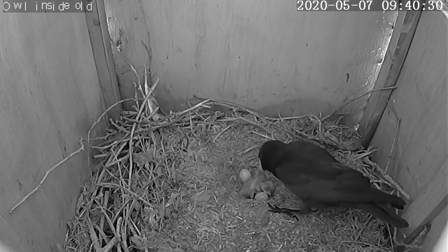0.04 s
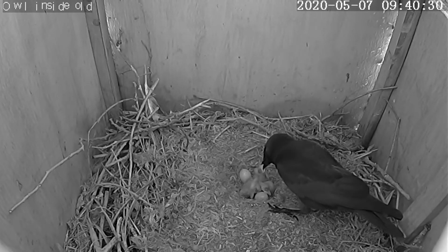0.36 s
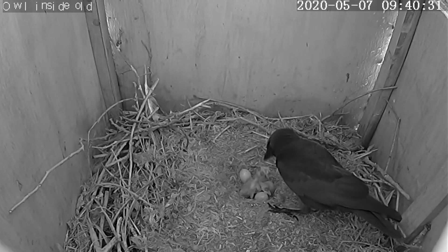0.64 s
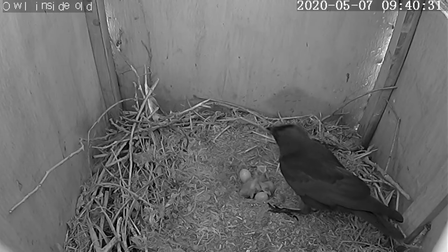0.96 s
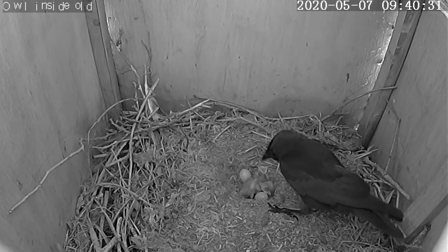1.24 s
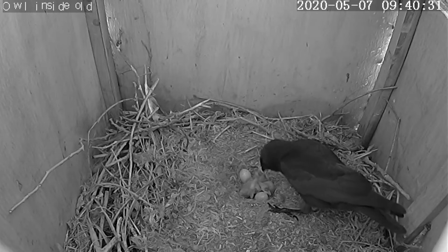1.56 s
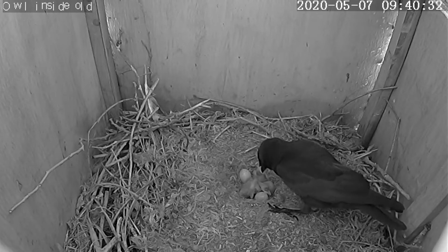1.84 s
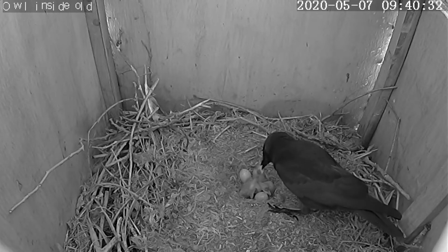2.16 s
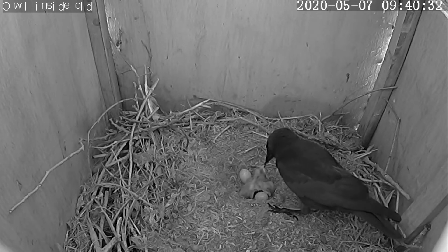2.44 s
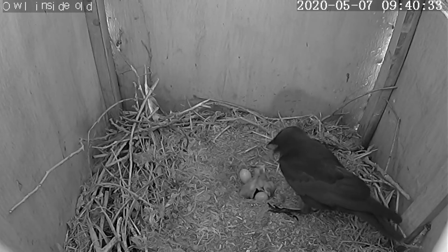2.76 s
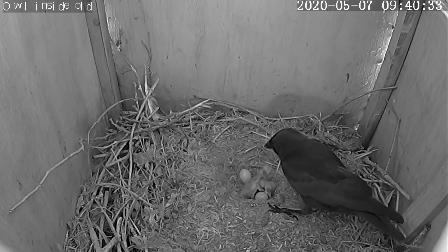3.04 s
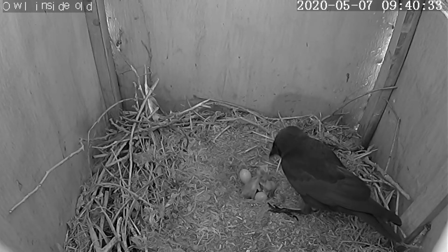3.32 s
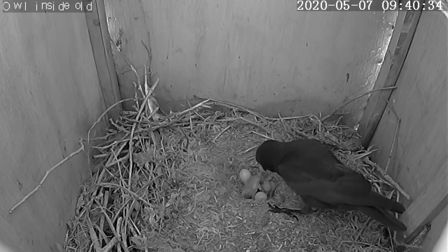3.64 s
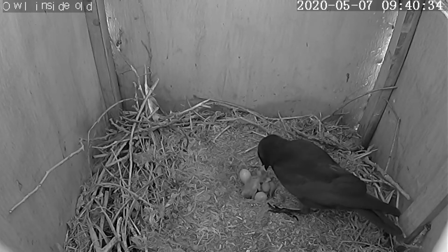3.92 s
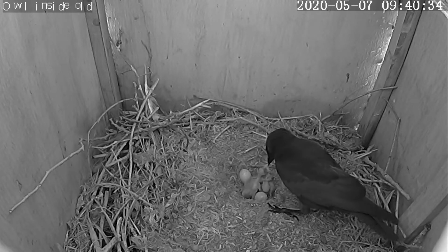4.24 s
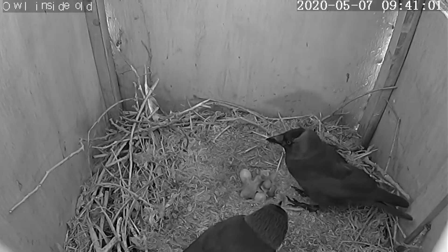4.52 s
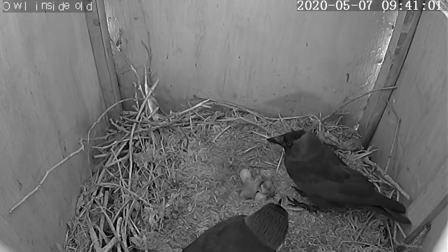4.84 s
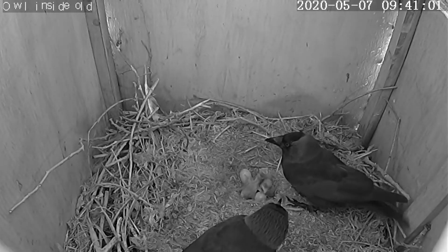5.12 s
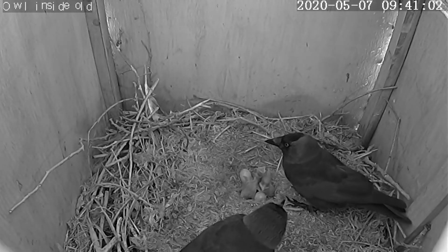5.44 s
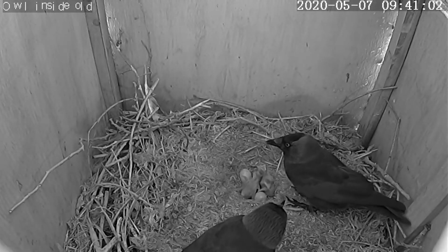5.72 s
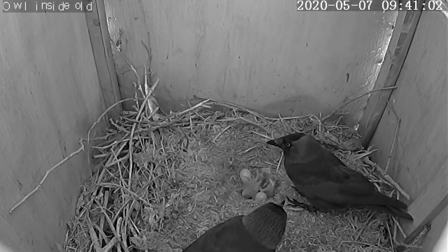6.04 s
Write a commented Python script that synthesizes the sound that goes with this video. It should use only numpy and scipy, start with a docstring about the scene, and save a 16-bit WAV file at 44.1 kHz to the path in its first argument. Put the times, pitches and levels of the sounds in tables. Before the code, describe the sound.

Newly hatched jackdaws beg with thin, arching whistles, some of them hoarse, over a faint hum. Midway a parent thumps and shuffles on the wooden boards. After a brief dropout the hum is gone, and an adult gives two loud, harsh calls with scratching and a quick wing flutter between them. A small microphone inside the nest box overloads slightly on the calls.

```python
"""Inside a wooden nest box, newly hatched jackdaws beg throughout with arched, partly hoarse whistles.
Near 3 s a parent thumps and shuffles: impacts ring the boards and friction makes noise. The humming nest
camera ticks once. Near 4.5 s a cut leaves a short silence, then softer noise without hum. From 5 s the
parent gives two harsh 'tchak' calls that overload the camera, with scratching and a wing flurry between.
All along, the camera's slow converter mirrors the sound into the treble."""
import sys
import numpy as np
from scipy import signal
from scipy.fft import rfft, irfft
from scipy.io import wavfile
from scipy.ndimage import uniform_filter1d

SR = 44100
rng = np.random.default_rng(int(sys.argv[2]) if len(sys.argv) > 2 else 0)


def master_out(mix):
    """Clip the mix to full scale and print it as 16-bit PCM to the path in sys.argv[1]."""
    frames = np.transpose(np.atleast_2d(mix))
    ceiling = np.clip(frames, -1, 1)
    pcm = np.round(ceiling * 32767).astype(np.int16)
    wavfile.write(sys.argv[1], SR, pcm)


N = 268128
T = np.arange(N) / SR
HZ = np.fft.rfftfreq(N, 1 / SR)
CUT_START_S, CUT_END_S = 4.455, 4.651

# spectrum of claws on wood and twigs: (frequency [Hz], level [dB])
CLAW_SPECTRUM = [(500, -16.5), (950, -9.5), (1200, 3.5), (1480, -14.5), (1700, 0), (1900, -14), (2100, 0),
                 (2350, 5), (2850, -1), (3400, -3.5), (4000, -17.5)]


def amp(db):
    """Amplitude ratio of a level in decibels."""
    return 10 ** (np.asarray(db) / 20)


def unit(x):
    """Normalisation to rms 1."""
    return x / np.sqrt(np.mean(x ** 2) + 1e-20)


def ramp(t, length):
    """Linear rise from 0 at t = 0 to 1 at t = length, then constant."""
    return np.clip(t / length, 0, 1)


def add(mix, start, sound):
    """Superposition of a sound on the mix from a start time in seconds."""
    part = mix[max(0, round(start * SR)):][:len(sound)]
    part += sound[:len(part)]


def colour(x, spectrum):
    """Spectral shaping by a curve of (frequency [Hz], gain [dB]) points."""
    hz, db = np.transpose(spectrum)
    return irfft(rfft(x) * amp(np.interp(np.log(HZ + 1), np.log(hz + 1), db)), N)


def noise(spectrum):
    """Filtered white noise of rms 1."""
    return unit(colour(rng.standard_normal(N), spectrum))


def wander(rate_hz):
    """Random modulation: low-passed noise of rms 1."""
    return unit(irfft(rfft(rng.standard_normal(N)) * np.exp(-(HZ / rate_hz) ** 2), N))


def resonate(x, hz, width_hz):
    """Double-pole resonance of gain 1 whose centre frequency may glide."""
    carrier = np.exp(2j * np.pi * np.cumsum(hz * np.ones(len(x))) / SR)
    pole = np.exp(-np.pi * width_hz / SR)
    baseband = signal.lfilter([(1 - pole) ** 2], [1, -2 * pole, pole * pole], x / carrier + 1e-18)
    return 2 * (carrier * baseband).real


def ring(modes, t, detune):
    """Free decay of damped modes, struck at a different spot each time; peak 1."""
    draws = rng.standard_normal((len(modes), 3))
    x = sum(amp(db + 2 * lift - 60 * t / t60) * np.sin(2 * np.pi * (hz * (1 + detune * shift) * t + phase))
            for (hz, db, t60), (lift, shift, phase) in zip(modes, draws))
    x = x * (1 - np.exp(-t / 0.002))
    return x / abs(x).max()


def nestlings(start_share=0.62, attack_s=0.0082, release_s=0.013, release_db=-21):
    """Frequency modulation: a thin whistle arches up, holds and falls; near the top it may rasp."""
    # (time [s], rise [s], hold [s], fall [s], top pitch [Hz], end pitch [Hz],
    #  level [dB], tail level [dB], hoarseness [0-1])
    squeaks = [ (-.06, 0.024, 0.013, 0.067, 3455, 3112, -19, -25, 0),
               (.125, 0.096, 0.012, 0.014, 3750, 3750, -70.5, -72, 0.2),
               (1.529, 0.029, 0.023, 0.049, 3024, 2550, -37, -36.5, 0.01),
               (1.637, 0.045, 0.014, 0.049, 3493, 3090, -31.5, -37.5, 0.22),
               (1.795, 0.029, 0.051, 0.11, 3430, 2637, -24.5, -26, 0.65),
               (2.205, .02, .11, 0.08, 3876, 3750, -39, -46, 0.12),
               (2.412, 0.038, 0.0097, 0.029, 2873, 2680, -40.5, -44.5, 0),
               (2.577, 0.03, .068, 0.085, 3461, 2494, -28, -22, 0.85),
               (2.63, 0.016, 0.029, 0.026, 832, 820, -38.5, -40, 0.13),
               (3.026, 0.055, 0.013, 0.053, 3885, 3250, -32.5, -38, 0.21),
               (3.279, 0.032, 0.062, 0.091, 3432, 2335, -25.5, -21, 0.7),
               (3.751, 0.0086, 0.025, 0.057, 3850, 3820, -56.5, -62, 0),
               (4.027, 0.03, 0.066, 0.083, 3426, 2425, -27.5, -21.5, 0.8),
               (4.08, 0.011, 0.025, 0.01, 817, 836, -41.5, -48, 0),
               (4.152, 0.036, 0.012, 0.027, 3232, 3020, -30.5, -38, 0.1),
               (4.407, 0.01, 0.023, 0.018, 1876, 1840, -54, -55, 0.07),
               (4.601, 0.028, 0.015, .066, 3448, 3033, -33, -37, .05),
               (4.635, 0.01345, 0.013, 0.015, 2020, 1940, -45, -52, 0.1),
               (4.786, .015, .01, .03, 2450, 2370, -64, -62, 0.17),
               (4.914, 0.033, .125, 0.12, 3810, 2330, -34.5, -38, 0.78),
               (5.212, .054, 0.014, 0.096, 3854, 3245, -33.5, -33, 0.36),
               (5.6, 0.023, 0.11, 0.04, 2840, 1910, -31.5, -30.5, 0.48),
               (5.743, .018, 0.13, 0.089, 3766, 2980, -30.5, -29.5, 0.42),
               (6.043, 0.033, .06, 0.17, 3860, 2500, -38.5, -39.5, 0.77), ]
    # one squeal that swells, cracks and drops to a clear note:
    # (time [s], pitch [Hz], level [dB], hoarseness [0-1])
    squeal = [(.336, 2785, -51, 0.42), (.35, 3487, -31.5, .4), (.365, 3900, -32, .15),
              (.4, 3870, -28.5, 0.49), (0.416, 3970, -15.5, 0.24), (.433, 3150, -20.5, 0.24),
              (.448, 3186, -15, 0.06), (0.473, 3157, -35.5, 0.11), (0.491, 2774, -32, 0.09),
              (0.516, 2595, -68, 0)]
    # resonances of the hoarse voice: (frequency [Hz], width [Hz], gain [dB])
    rasp_formants = [(903, 68, -17), (1108, 89, -17.5), (1878, 45, -8.5), (2260, 180, -13),
                     (2877, 260, 0.5), (3522, 160, 0), (3800, 530, -3.5)]
    # standing waves in the box lift and dip a gliding whistle: (frequency [Hz], gain [dB])
    standing_waves = [(1900, -2), (2400, -5.5), (2640, -3.5), (2820, 4.5), (3020, 0.5), (3200, -10),
                      (3340, -1.5), (3900, -2.5)]
    hoarse_lag_s, clearing_s = 0.02, 0.025
    rattle = rng.standard_normal(N) * amp(1.5 * wander(340))
    rasp = amp(1) * unit(sum(amp(db) * resonate(rattle, hz, width) for hz, width, db in rasp_formants))
    shimmer, jitter = unit(amp(3 * wander(79))), wander(290)

    def voice(at, hz, db, hoarse, whistle_db=0):
        """Crossfade from periodic whistle to aperiodic rasp as hoarseness grows."""
        breathy = np.sin(np.pi / 2 * np.clip(hoarse, 0, 1)) ** 2
        cycles = np.cumsum(hz * (1 + (.002 + .055 * hoarse) * jitter[at])) / SR
        whistle = np.sqrt(2 * (1 - breathy ** 2)) * np.sin(2 * np.pi * cycles) * shimmer[at]
        fade = signal.windows.tukey(len(hz), .04)
        return amp(db) * (amp(whistle_db) * whistle + breathy * rasp[at]) * fade

    out = np.zeros(N)
    for start, rise, hold, fall, top_hz, end_hz, level_db, tail_db, hoarse in squeaks:
        at = (T >= start) & (T < start + rise + hold + fall)
        t = T[at] - start
        since_hold = t - rise - hold
        up = np.sin(np.pi / 2 * ramp(t, rise))
        down = ramp(since_hold, fall)
        down = .5 * down + .5 * np.sin(np.pi / 2 * down) ** 2  # half straight, half eased
        hz = top_hz * (start_share + (1 - start_share) * up) + (end_hz - top_hz) * down
        clear = ramp(since_hold, clearing_s)  # the voice clears as its pitch falls
        release = ramp(since_hold - fall + release_s, release_s)
        db = level_db + (tail_db - level_db) * clear + release_db * release
        rough = hoarse * (.22 + .78 * ramp(t, rise + hoarse_lag_s) ** 2) * (1 - clear)
        standing_db = np.interp(hz, *np.transpose(standing_waves))
        out[at] += ramp(t, attack_s) ** 2 * voice(at, hz, db, rough, standing_db)
    times, *curves = np.transpose(squeal)
    at = (T >= times[0]) & (T < times[-1])
    out[at] += voice(at, *(np.interp(T[at], times, curve) for curve in curves))
    return out


def parent_calls(gain_db=1, jitter=0.016, flutter_db=5, cluck_s=0.035):
    """Source and filter: a clean yelp breaks into rough, sagging harmonics under a falling formant."""
    # (time [s], length of the loud part [s], effort [dB], starting pitch [Hz])
    calls = [(5.021, .1, 2.5, 681), (5.770, 0.1, 2, 660)]
    # steady resonances of the throat and the box around it: (frequency [Hz], width [Hz], gain [dB])
    formants = [(230, 220, -12), (600, 150, -7), (1250, 260, -4), (1850, 300, -7), (2370, 260, -3),
                (2800, 300, -2)]
    pop_s, pop_db, pop_hz = 0.003, 27, 1470  # the throat snaps open from a low resonance
    yelp_s, yelp_db, break_s = .016, -10.5, 0.0017
    sag_after_s, sag_hz_per_s = .034, 4500
    open_hz, shut_hz, closing_s = 2674, 1557, .022
    tiring_db_per_s, stop_db_per_s, stop_s = -87.5, -850, 0.034
    low_pass = signal.butter(8, 3000, fs=SR, output="sos")
    out = np.zeros(N)
    for start, length, effort_db, top_hz in calls:
        t = np.arange(0, length + stop_s, 1 / SR)
        pop = 1 - ramp(t, pop_s)
        broken = ramp(t - yelp_s, break_s)  # period doubling: odd harmonics appear
        since_break = np.maximum(t - yelp_s, 0)
        hz = top_hz - sag_hz_per_s * np.maximum(np.minimum(t, length) - sag_after_s, 0)
        cycles = np.cumsum(hz * (1 + jitter * broken * wander(400)[:len(t)])) / SR
        pulses = sum(broken ** (k % 2) * np.cos(2 * np.pi * (k * cycles + rng.random()))
                     for k in range(1, 9))
        pulses *= amp(flutter_db * broken * wander(330)[:len(t)])  # sidebands between the harmonics
        hiss = amp(-2) * noise([(100, -12.5), (400, 5.5), (2900, 7.0), (3800, -37.0)])[:len(t)]
        rough = .04 + .31 * broken
        source = (1 - rough) * unit(pulses) + rough * hiss

        throat_hz = shut_hz + (open_hz - shut_hz) * np.exp(-since_break / closing_s)
        throat_hz += (pop_hz - throat_hz) * pop
        gliding = resonate(source, throat_hz, width_hz=600)
        steady = sum(amp(db) * resonate(source, centre, width) for centre, width, db in formants)
        voice = signal.sosfilt(low_pass, gliding + (0.093 + 0.8 * broken) * steady)
        voice /= np.sqrt(abs(uniform_filter1d(voice ** 2, size=300)) + 1e-9)  # flatten the envelope
        onset_db = pop_db * pop + yelp_db * (1 - broken)
        decay_db = tiring_db_per_s * since_break + stop_db_per_s * np.maximum(t - length, 0)
        envelope = amp(gain_db + effort_db + onset_db + decay_db) * ramp(t[-1] - t, stop_s / 2)
        add(out, start, envelope * voice)

        # a short cluck as the bill opens
        cluck = noise([(300, -23.0), (620, -2.5), (1000, -29.0), (2200, -8.0), (3000, -36.0)])[:len(t)]
        add(out, start - .01, amp(-24) * cluck * np.exp(-t / cluck_s) * ramp(t[-1] - t, stop_s))
    return out


def knocks(wood_gain_db=-2, crack_gain_db=-5, thud_gain_db=3, crack_s=0.0089, crack_rise_s=0.001):
    """Impact excitation: each blow of foot or bill cracks, rings the boards and thuds in the panels."""
    # (time [s], level [dB], relative crack level [dB], relative thud level [dB])
    blows = [(1.485, -35, -35, -30), (2.957, -9, -14.5, -19.5), (2.962, -4.5, -40, -29),
             (2.97, -10, -49, -12), (3.001, -18.5, -26, -8.5), (3.04, -17, -1, -12.5),
             (3.129, -14.5, -16, -34), (3.151, -19.5, -9.5, -30), (3.19, -20, -43, -18),
             (3.21, -23, -42, -17), (3.222, -27, -46, -14.5), (3.271, -34.5, -13, -13.5),
             (3.315, -15.5, -32, -27), (3.435, -33, -10, -21), (3.74, -53, -31, 3), (3.82, -52.5, -30, 4.5),
             (5.295, -33.5, 3, -31), (5.342, -34, -1, -34), (5.37, -31, -6, -36), (5.413, -19, -4, -27),
             (5.466, -20.5, 1.5, -33.5), (5.537, -31.5, 0, -20)]
    # modes of the box's boards: (frequency [Hz], level [dB], 60 dB decay time [s])
    board_modes = [(312, -9.5, 0.045), (414, -15, 0.36), (556, 1.5, .03), (614.7, 3, 0.095),
                   (691.3, -2.5, 0.11), (807, -7.5, 0.098), (950, -10.5, .04), (1410, -12, 0.071),
                   (1938, -28.5, 0.023)]
    # low modes of its panels: (frequency [Hz], level [dB], 60 dB decay time [s])
    panel_modes = [(53, -9, .25), (83, 4.5, 0.083), (165.3, -7, 0.28), (258, -5, 0.42)]
    out, t, claws = np.zeros(N), T[:SR // 3], noise(CLAW_SPECTRUM)
    crack_envelope = np.exp(-t / crack_s) * ramp(t, crack_rise_s)
    for start, db, crack_db, thud_db in blows:
        burst = np.roll(claws, -round(start * SR))[:len(t)] * crack_envelope
        crack = amp(crack_db + crack_gain_db) * burst
        wood = amp(wood_gain_db) * ring(board_modes, t, detune=0.056)
        thud = amp(thud_db + thud_gain_db) * ring(panel_modes, t, detune=0.011)
        add(out, start, amp(db) * (wood + crack + thud))
    return out


def shuffle(grain_db=4, swell_s=.12, fade_s=0.13, edge_db=-15.5):
    """Friction noise: feathers and claws drag over the boards in uneven catches."""
    # (time [s], length [s], rubbing level [dB], scratching level [dB], rumble level [dB])
    bouts = [(3.018, 0.47, -40, -64, -39.5), (5.265, 0.29, -38.5, -39.5, -56)]
    # feathers rubbing on wood: (frequency [Hz], level [dB])
    rub_spectrum = [(88, -43), (150, -23), (253, -16.5), (320, -22.5), (364, -9.5), (525, -1.5), (700, 4.5),
                    (777, -17.5), (893, -23), (974, -7), (1200, -23), (1560, -43.5), (2640, -120)]
    # low rumble under the rubbing: (frequency [Hz], level [dB])
    rumble_spectrum = [(25, -12), (50, 8.5), (85, -5), (125, -19.5), (200, -13.5), (255, 3), (310, -10.5),
                       (450, -47)]
    catches = unit(amp(grain_db * wander(81)))
    rub = amp(1) * noise(rub_spectrum) * catches
    scratch = amp(1) * noise(CLAW_SPECTRUM) * catches
    rumble = amp(4) * noise(rumble_spectrum)
    out = np.zeros(N)
    for start, length, rub_db, scratch_db, rumble_db in bouts:
        effort = ramp(T - start, swell_s) * ramp(start + length - T, fade_s)
        envelope = (effort > 0) * amp(edge_db * (1 - effort))
        out += envelope * (amp(rub_db) * rub + amp(scratch_db) * scratch + amp(rumble_db) * rumble)
    return out


def wings(start_s=5.5745, period_s=.0208, stroke_s=0.012, tail_s=0.0096, count=8):
    """Incoherent addition: evenly spaced wing strokes brush the wall; strokes and tails sum in power."""
    # feathers brushing the wall: (frequency [Hz], level [dB])
    feather_spectrum = [(150, -55.5), (280, -16.5), (420, -11), (600, -0.5), (720, 2.5), (860, -8),
                        (1000, -10), (1300, -11.5), (1550, -21), (1890, -9.5), (2200, -26), (2550, -33),
                        (2900, -24), (4000, -31)]
    strongest_s, width_s = 5.655, 0.07  # the flurry swells, then eases off
    power = np.zeros(N)
    t = np.arange(0, stroke_s, 1 / SR)
    stroke = np.sin(np.pi * np.sqrt(t / stroke_s)) ** 2
    for start in start_s + period_s * np.arange(count):
        db = -7 - 14.5 * ((start - strongest_s) / width_s) ** 2
        add(power, start, amp(db) ** 2 * stroke)
    decay = np.exp(-2 / (tail_s * SR))
    envelope = np.sqrt(signal.lfilter([1 - decay], [1, -decay], power + 1e-18))
    brush = noise(feather_spectrum)
    brush /= np.sqrt(abs(uniform_filter1d(brush ** 2, size=500)) + 1e-9)
    return envelope * brush


def box_reverb(x, wet_db=-18, t60_s=.088):
    """Reverberation: reflections between close walls give a very short, dense tail."""
    t = T[:SR // 4]
    tail = rng.standard_normal(len(t)) * amp(-60 * t / t60_s) * (t > .002)
    return x + amp(wet_db) * signal.fftconvolve(x, tail / np.linalg.norm(tail))[:N]


def background(early_db=-54.5, late_db=-58.5):
    """Noise floor: dull air noise and mains harmonics, then only a softer noise after the cut."""
    # air in the box before the cut: (frequency [Hz], level [dB])
    early_spectrum = [(25, -8), (50, -5.5), (100, -15), (170, -7), (270, -6), (350, -11.5), (480, -11),
                      (600, -3.5), (690, -3.5), (790, -15.5), (1200, -21.5), (2000, -24.5), (3200, -29),
                      (4000, -33)]
    # noise after the cut: (frequency [Hz], level [dB])
    late_spectrum = [(25, -10.5), (60, -9), (170, -2.5), (350, -8.5), (600, -10), (800, -14.5),
                     (1200, -20.5), (2000, -19.5), (3000, -29), (4000, -27.5)]
    # mains hum: (frequency [Hz], level [dB])
    harmonics = [(50, -58.5), (100, -68.5), (150, -66.5), (250, -62), (350, -81), (650, -66)]
    swell = amp(.6 * wander(4))
    air = amp(early_db) * noise(early_spectrum) * swell
    hum = sum(amp(db) * np.sqrt(2) * np.sin(2 * np.pi * (hz * T + rng.random())) for hz, db in harmonics)
    late_noise = amp(late_db) * noise(late_spectrum) * swell
    return np.where(T < CUT_START_S, air + hum, late_noise)


def scene():
    """Superposition at one microphone, carried by both channels."""
    mono = box_reverb(nestlings() + parent_calls()) + knocks() + shuffle() + wings() + background()
    return np.array([mono, mono])


def record(dry, ceiling=0.49, low_cut_hz=66, converter_hz=8000, tick_s=3.092, edge_hz=15600, right_db=0.47):
    """Saturation and spectral imaging: the camera overloads, mirrors the band and ticks once."""
    # the converter's response to the band and its images: (frequency [Hz], gain [dB])
    converter_response = [(3700, -1), (4300, -3.5), (5000, -10), (5500, -13.5), (6500, -25.5), (7400, -46),
                          (8600, -48.5), (9500, -32), (10500, -24.5), (11800, -18.5), (13000, -23.5),
                          (14000, -34), (14600, -33.5), (15400, -63)]
    x = dry.mean(0)
    x = x / (1 + (x / ceiling) ** 4) ** (1 / 4)  # soft clipping
    x = signal.sosfilt(signal.butter(4, low_cut_hz, "high", fs=SR, output="sos"), x)
    x = x * ((T < CUT_START_S) | (T > CUT_END_S))  # a short silence at the cut
    anti_alias = np.sqrt(.5 - .5 * np.tanh((HZ - converter_hz / 2) / 60))
    x = irfft(rfft(x) * anti_alias, N)
    # sampling mirrors the band about the converter's rate and twice that rate
    x = x * (1 + 2 * np.cos(2 * np.pi * converter_hz * T) + 2 * np.cos(4 * np.pi * converter_hz * T))
    x = colour(x, converter_response)
    add(x, tick_s, amp([-27]))  # electrical tick
    x = irfft(rfft(x) * (HZ < edge_hz), N)
    return np.array([x, x * amp(right_db)])


dry = scene()
out = record(dry)
master_out(out)
```